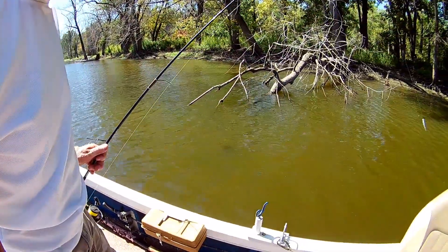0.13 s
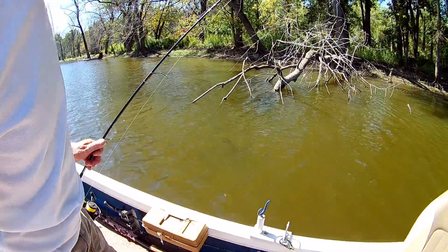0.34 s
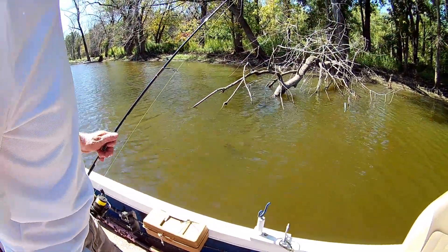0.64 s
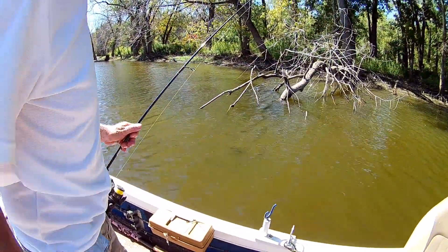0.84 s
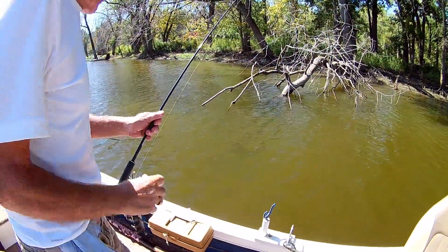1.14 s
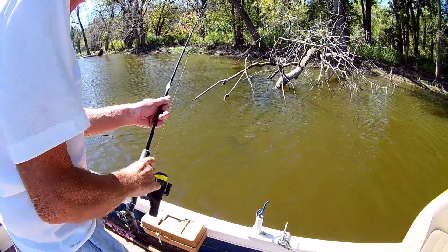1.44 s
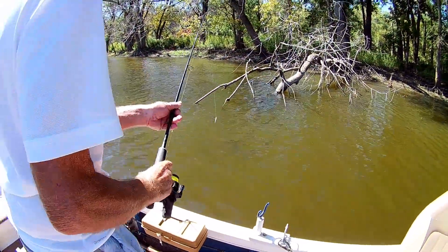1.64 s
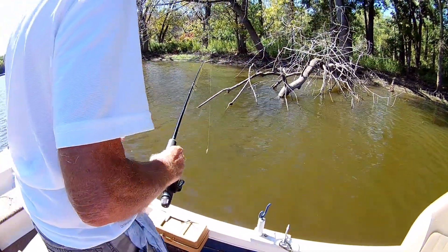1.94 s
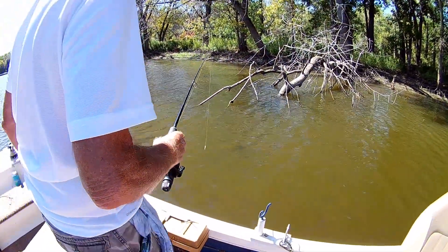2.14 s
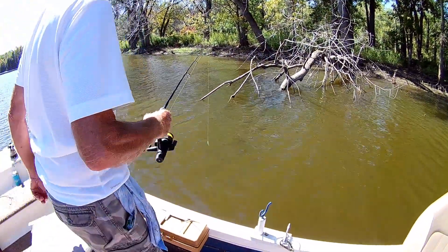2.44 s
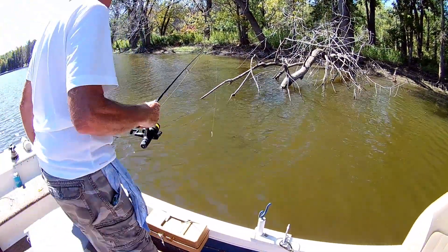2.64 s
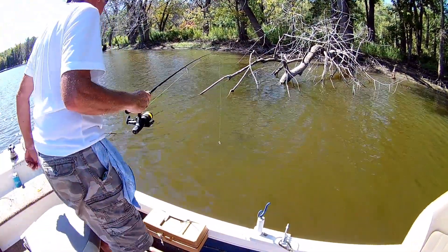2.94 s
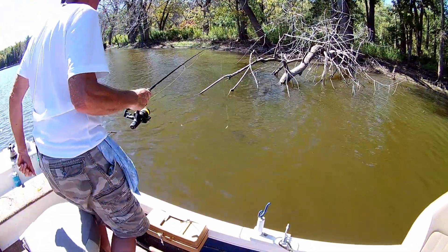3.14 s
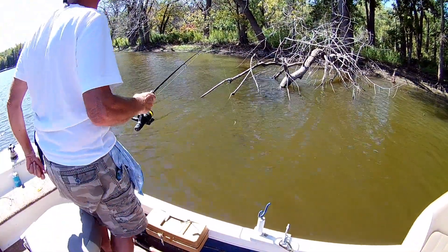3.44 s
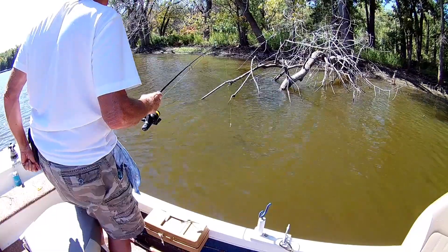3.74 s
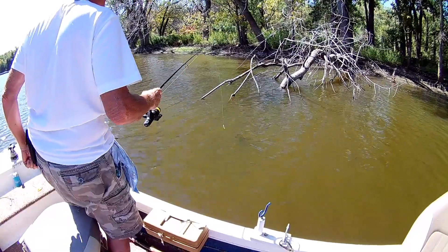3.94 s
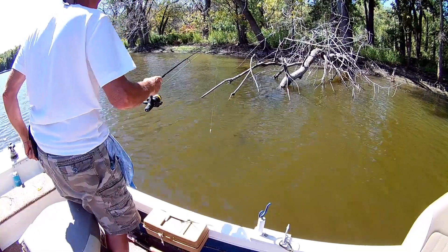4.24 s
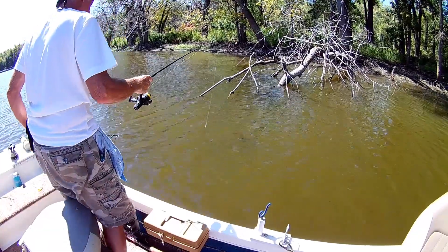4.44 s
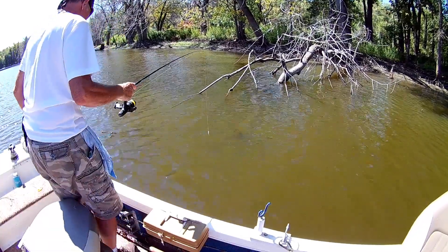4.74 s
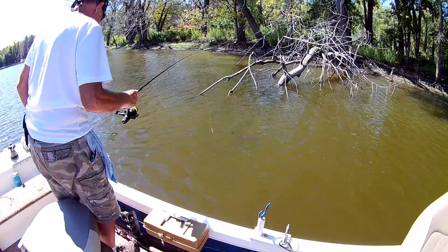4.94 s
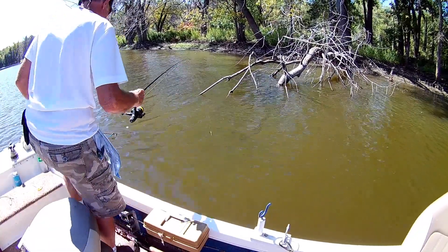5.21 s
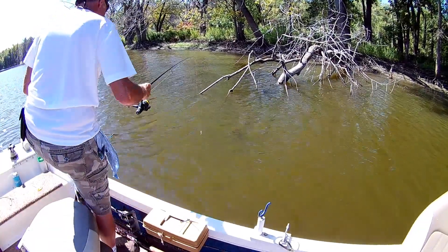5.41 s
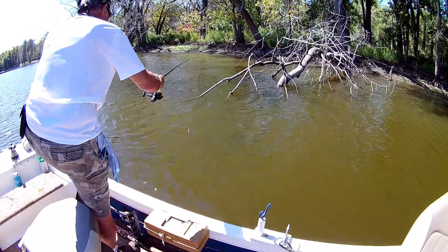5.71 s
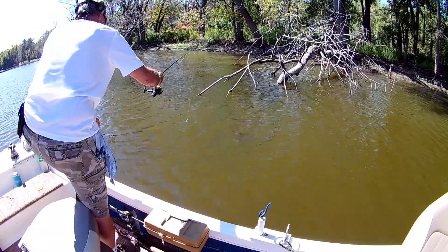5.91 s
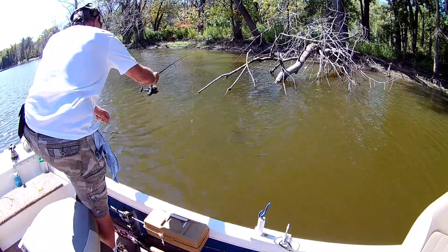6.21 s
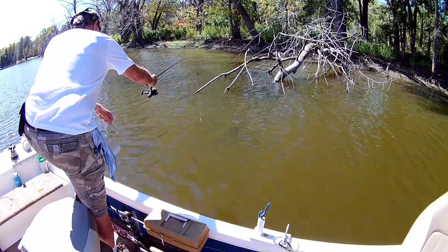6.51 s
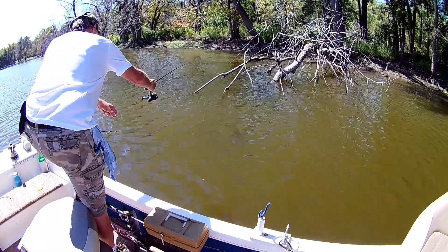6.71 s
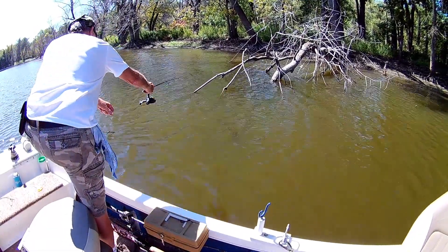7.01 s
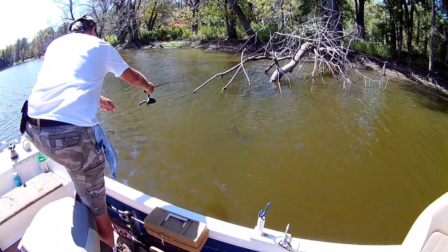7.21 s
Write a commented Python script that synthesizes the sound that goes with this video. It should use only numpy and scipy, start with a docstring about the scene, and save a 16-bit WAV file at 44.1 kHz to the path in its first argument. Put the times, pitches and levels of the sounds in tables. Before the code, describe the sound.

Close on a small boat's deck, fishing gear clatters hard against the hollow hull in the first second, with sharp ticks, rough scuffs and woody knocks. Dull foot thumps follow, bunching after two seconds, with one firm knock soon after. Later steps are softer and spaced out. Small water plops, faint lapping, low rumble, weak hum and thin hiss remain beneath, dry and outdoors.

```python
"""Angler on a small boat

Shifting feet thump the deck while gear knocks, ticks and scuffs on the hollow hull, with a few faint tones.
Ripples plop under the hull, over a low rumble, a faint hum and a thin hiss. Blows are decaying sines with
resonant noise; scuffs, lapping and hiss are shaped noise; plops are rising sines. Each move of the angler
swells the background."""
import sys
import numpy as np
from scipy.fft import rfft, irfft, next_fast_len
from scipy.io import wavfile
from scipy.ndimage import map_coordinates

SR = 44100
rng = np.random.default_rng(int(sys.argv[2]) if len(sys.argv) > 2 else 0)


def wrap_up_sound(samples):
    """Save the sound to the file named by the first command line argument, as 16-bit audio."""
    columns = np.atleast_2d(samples).T
    # keep every value between -1 and 1, then stretch to whole-number steps
    tamed = np.clip(columns, -1, 1)
    steps = np.round(tamed * 32767).astype(np.int16)
    wavfile.write(sys.argv[1], SR, steps)


N = 324576  # length in samples


def amp(db):
    """Turn decibels into gain."""
    return 10 ** (np.asarray(db) / 20)


def unit(x):
    """Scale to rms 1."""
    return x / np.sqrt(np.mean(x ** 2) + 1e-20)


def along(points, hz):
    """Read a curve of (Hz, value) points on a log frequency axis."""
    f, value = np.transpose(points)
    return np.interp(np.log(hz + 1), np.log(f), value)


def wobble(rate):
    """Draw a smooth random curve through `rate` knots a second."""
    knots = rng.standard_normal(int(N * rate / SR) + 4)
    return map_coordinates(knots, [np.arange(N) * rate / SR])


def filtered(x, response):
    """Filter x by a complex response of frequency, padded so the tail does not wrap."""
    size = next_fast_len(len(x) + 8192)
    spectrum = rfft(x, size) * response(np.fft.rfftfreq(size, 1 / SR))
    return irfft(spectrum, size)[:len(x)]


def noise(colour, size):
    """Noise of rms 1 with the given (Hz, dB) colour."""
    return unit(filtered(rng.standard_normal(size), lambda hz: amp(along(colour, hz))))


def fade(t, t60, attack):
    """A quick rise and an exponential decay by 60 dB in t60 seconds, 4 ms at least."""
    return amp(-60 * t / max(t60, 0.004)) * (1 - np.exp(-t / attack))


def sine_rms(envelope):
    """The rms of a sine under this envelope."""
    return np.sqrt(np.mean(envelope ** 2) / 2)


def burst(carrier, envelope):
    """A noisy carrier under an envelope, with the energy of a sine under that envelope."""
    return unit(carrier * envelope) * sine_rms(envelope)


def body(modes, f):
    """Response of a body as a sum of (Hz, width Hz, dB) resonances."""
    return sum(amp(db) * 1j * f * width / (centre * centre - f * f + 1j * f * width)
               for centre, width, db in modes)


def add(track, start, sound):
    """Mix a sound into the track at start seconds."""
    part = track[max(round(start * SR), 0):][:len(sound)]
    part += sound[:len(part)]


# Steady tones. Each row: pitch in Hz, rms level in dB, speed of the wavering in knots per second.
HUM_TONES = [(53.8, -52, 7.2), (238.7, -55.5, 9), (3310, -79, 24)]


def hum():
    """A faint low hum and a thin whine, each wavering in level and phase."""
    t = np.arange(N) / SR
    out = np.zeros(N)
    for hz, db, waver_rate in HUM_TONES:
        swell = 1 + wobble(waver_rate) / 2
        out += amp(db) * unit(swell * np.sin(2 * np.pi * hz * t + wobble(waver_rate)))
    return out


# Steps and shifts of weight. Each row: height of the move in seconds, strength in dB,
# time to settle by 60 dB in seconds.
WEIGHT_SHIFTS = [(0.02, -5.5, 0.2), (0.15, -2, 0.5), (0.335, 16.5, 0.18), (0.505, 15.5, 0.55),
                 (0.68, 6, 0.86), (1.0, -3, 0.6), (1.6, 2, 0.84), (1.98, -0.5, 0.4), (2.18, 6, 1.1),
                 (2.32, 9, 0.84), (2.65, 10, 0.5), (2.86, -1, 1.2), (3.04, 2.5, 0.25), (3.27, -1, 0.2),
                 (3.42, 5, 0.6), (3.72, -1, 0.64), (4.07, -0.5, 0.4), (4.44, 3, 0.63), (4.785, 4.5, 0.4),
                 (5.11, -6, 1.0), (5.48, -1, 1.0), (5.84, 2, 0.5), (5.97, 0, 0.6), (6.32, 6.5, 0.55),
                 (6.54, 1.5, 0.2), (6.675, 7, 0.5), (7.06, -3, 1.6)]


def movement(wind_up_s=0.38, haste_per_db=0.035):
    """How hard the angler moves: each move builds by 60 dB, peaks and settles, stronger ones building faster."""
    t, power = np.arange(N) / SR, np.zeros(N)
    for peak, db, settle in WEIGHT_SHIFTS:
        build = wind_up_s * np.exp(-haste_per_db * db)
        drop_db = 60 * np.maximum((peak - t) / build, (t - peak) / settle)
        power += amp(db - drop_db) ** 2
    return np.sqrt(power)


def swell_with(effort, settings):
    """The gain of a background layer: its resting level and the part stirred by movement, added in power."""
    rest_db, move_db, growth = settings
    return np.hypot(amp(rest_db), amp(move_db) * effort ** growth)


# The rocking hull. Colour, each row: frequency in Hz, relative level in dB. Swell: level at rest in dB,
# level stirred by a 0 dB move in dB, growth in dB per dB of strength.
RUMBLE_COLOUR = [(11, -34), (18, 0), (59, 2.5), (97, -6), (130, -10.5), (170, -32), (290, -120)]
RUMBLE_SWELL = (-49.5, -40.5, 1.0)


def rumble(effort):
    """The hull rumbles as it rocks: low noise that follows the movement."""
    return swell_with(effort, RUMBLE_SWELL) * noise(RUMBLE_COLOUR, size=N)


# Soles on the deck. Colour, each row: frequency in Hz, relative level in dB. Swell, before the flutter:
# level at rest in dB, level stirred by a 0 dB move in dB, growth in dB per dB of strength.
SHUFFLE_COLOUR = [(50, -9), (90, 0.5), (160, 0), (240, -3), (330, -7.5), (480, -13.5), (800, -39),
                  (2000, -70)]
SHUFFLE_SWELL = (-52.5, -46.5, 0.83)


def shuffle(effort):
    """Soles shuffle: dull noise flutters unevenly and swells with each move."""
    flutter = amp(1.5 * wobble(25))
    return swell_with(effort, SHUFFLE_SWELL) * flutter * noise(SHUFFLE_COLOUR, size=N)


# A thin hiss. Colour, each row: frequency in Hz, relative level in dB. Swell, before the flutter:
# level at rest in dB, level stirred by a 0 dB move in dB, growth in dB per dB of strength.
HISS_COLOUR = [(1290, -19), (2200, -0.5), (3170, -2.5), (3390, -0.5), (3670, -6.5), (4970, -3), (5610, -6),
               (6190, 0), (6600, -2.5), (7340, 0), (9220, -7), (10000, 1), (10900, -4), (14800, 1),
               (15400, -8)]
HISS_SWELL = (-66, -60, 0.6)


def hiss(effort):
    """A thin, lightly fluttering hiss that swells with the movement."""
    flutter = amp(0.94 * wobble(25))
    return swell_with(effort, HISS_SWELL) * flutter * noise(HISS_COLOUR, size=N)


def bubble(hz, t60=0.045, rise=6, attack=0.0046):
    """A pocket of air rings, its pitch rising by `rise` times hz per second as it nears the surface."""
    t = np.arange(SR // 10) / SR
    bent_time = t + rise * (t * t / 2 - attack * t)
    return np.sin(2 * np.pi * hz * bent_time) * fade(t, t60, attack)


def ripples(count, centre_hz=900, spread=0.576, scatter_db=5):
    """Many tiny, dead splashes along the waterline, scattered in time, pitch and level, at rms 1."""
    out = np.zeros(N)
    for when, pitch, size in rng.random((count, 3)):
        hz = centre_hz * np.exp(spread * (2 * pitch - 1))
        splash = bubble(hz, t60=0.025, rise=2.5, attack=0.00051)
        add(out, when * N / SR, amp(scatter_db * (2 * size - 1)) * splash)
    return unit(out)


# Water against the hull. Colour, each row: frequency in Hz, relative level in dB. Swell, before flutter and
# ripples: level at rest in dB, level stirred by a 0 dB move in dB, growth in dB per dB of strength.
LAPPING_COLOUR = [(250, -17.5), (500, 2), (800, 0), (1100, -1.5), (1450, -6), (1800, -9), (2400, -17),
                  (4000, -19.5), (9000, -51)]
LAPPING_SWELL = (-59.5, -54.5, 0.68)


def lapping(effort, ripple_db=-8.5):
    """Water laps as fluttering noise sprinkled with tiny bubbles, more so as the angler moves."""
    wash = amp(wobble(30)) * noise(LAPPING_COLOUR, size=N)
    return swell_with(effort, LAPPING_SWELL) * (wash + amp(ripple_db) * ripples(count=500))


# Ripples trapped under the hull. Each row: start in seconds, level in dB before the trim, bubble pitch in Hz.
HULL_PLOPS = [(0.048, -43, 1070), (1.394, -40.5, 1300), (2.138, -41, 1240), (3.339, -37, 1040),
              (4.364, -36, 990), (4.597, -37, 948), (4.736, -46, 912), (5.516, -42, 1410),
              (5.795, -38, 840), (6.537, -45, 1170), (6.837, -39, 1170)]


def plops(trim_db=1):
    """The few ripples that slap the hull clearly, each a single rising bubble."""
    out = np.zeros(N)
    for start, db, hz in HULL_PLOPS:
        add(out, start, amp(db + trim_db) * bubble(hz))
    return out


# Clean tones, the last two short squeaks. Each row: start in seconds, length in seconds, pitch in Hz,
# peak level in dB.
THIN_TONES = [(0.02, 0.93, 812, -51), (0.356, 0.68, 670, -53), (0.63, 0.04, 4850, -48.5),
              (3.44, 0.06, 12327, -56)]


def tones():
    """Faint pure tones that swell and fade under half a sine."""
    out = np.zeros(N)
    for start, length, hz, db in THIN_TONES:
        t = np.arange(int(length * SR)) / SR
        add(out, start, amp(db) * np.sin(np.pi * t / length) * np.sin(2 * np.pi * hz * t))
    return out


# Gear and soles dragged over the deck. Each row: start in seconds, length in seconds, level in dB mid-stroke.
SCUFF_STROKES = [(0.28, 0.115, -34.5), (0.445, 0.2, -35), (0.643, 0.084, -37), (2.29, 0.25, -43),
                 (3.338, 0.13, -47.5), (4.39, 0.11, -49.5), (6.63, 0.095, -49)]
# Colour of the rough deck. Each row: frequency in Hz, relative level in dB.
SCUFF_COLOUR = [(150, -20), (370, 2), (600, -1.5), (900, 2), (1450, -1), (1800, -14), (3000, -18),
                (6000, -27.5), (9000, -38), (15000, -40)]


def scuffs(grit_db=2.5, grit_rate=180):
    """Each stroke swells and fades, catching unevenly on the rough deck (grit in knots per second)."""
    pressure = np.zeros(N)
    for start, length, db in SCUFF_STROKES:
        add(pressure, start, amp(db) * np.hanning(int(length * SR)))
    grit = amp(grit_db * wobble(grit_rate))
    return pressure * unit(grit * noise(SCUFF_COLOUR, size=N))


# Rod and reel ticking against the side; the row at 2.651 s adds brightness to the hull knock at 2.648 s. # Each
# row: start in seconds, level in dB before the trim, decay by 60 dB in seconds, brightness in dB per octave.
GEAR_TICKS = [(0.327, -30, 0.018, 8), (0.331, -14, 0.01, 6.5), (0.342, -29, 0.02, 4), (0.35, -29, 0.042, 7),
              (0.369, -28, 0.021, 11), (0.382, -33, 0.033, 11), (0.505, -8.5, 0.024, -10),
              (0.564, -29, 0.039, -3), (0.577, -25.5, 0.048, -0.5), (0.591, -25, 0.04, -4.5),
              (0.678, -22, 0.04, -2), (0.684, -22, 0.04, 1.5), (0.8, -32, 0.035, -6),
              (0.824, -27.5, 0.044, -5.5), (0.84, -29.5, 0.047, -7), (0.958, -32.5, 0.041, -4.5),
              (2.203, -41, 0.03, -5), (2.651, -31, 0.05, -6), (3.415, -35.5, 0.022, -2)]
# Resonances of rod and reel. Each row: frequency in Hz, width in Hz, relative level in dB.
ROD_MODES = [(1410, 390, 11.5), (2110, 65, 22), (2333, 90, 24), (2670, 77, 17.5), (2850, 110, 15),
             (3370, 58, -18), (3500, 120, -14), (4160, 130, -16), (4800, 130, -12), (5400, 130, -24),
             (6060, 160, -6), (6640, 200, -27)]
# Colour of the scrape. Each row: frequency in Hz, relative level in dB.
SCRAPE_COLOUR = [(500, -21), (1200, 9.5), (3100, -2), (4000, -0.5), (7000, -16), (9000, -60), (15000, -47)]


def ticks(attack=0.00047, trim_db=-3, pivot_hz=3000, scrape_db=-5):
    """Short contacts ring the modes of the rod and reel over a broad scrape, each with its own brightness."""
    out, t = np.zeros(N), np.arange(SR // 5) / SR
    for start, db, t60, tilt_db in GEAR_TICKS:
        hit = rng.standard_normal(len(t))
        modes = unit(filtered(hit, lambda f: body(ROD_MODES, f) / (1 + (f / 8000) ** 4)))
        contact = modes + amp(scrape_db) * noise(SCRAPE_COLOUR, size=len(t))
        # the tilt pivots at 3 kHz and levels off outside 0.3 to 2 times that
        contact = filtered(contact, lambda f: amp(tilt_db * np.log2(np.clip(f / pivot_hz, 0.3, 2))))
        add(out, start, amp(db + trim_db) * burst(contact, fade(t, t60, attack)))
    return out


# The boat's lively notes, where a blow rings on. Each row: pitch in Hz, width in Hz,
# decay time added in seconds.
LIVELY_NOTES = [(161, 14, 0.09), (303.6, 8.8, 0.063), (392, 16, 0.15), (877, 12, 0.073), (1536, 25, 0.03)]


def lingering(hz):
    """Extra ring time in seconds of a blow that lands near a lively note."""
    return sum(added / (1 + (2 * (hz - note) / width) ** 2) for note, width, added in LIVELY_NOTES)


# Feet and heavy gear flexing the deck. Each row: start in seconds, level in dB, panel pitch in Hz.
DECK_THUMPS = [(0.333,-20,127), (0.345,-20.5,307), (0.350,-24,386), (0.501,-24.5,392), (0.513,-18,305),
               (0.545,-29,352), (0.594,-22,304), (0.668,-21,268), (0.683,-26,379), (1.596,-24,155.7),
               (1.969,-31,265), (2.199,-28.5,335), (2.291,-23,292), (2.315,-16.5,221), (2.347,-24.5,101),
               (2.376,-26,84), (2.434,-27,101.5), (2.498,-27.5,88), (2.65,-27,150), (2.665,-27,378),
               (2.672,-23.5,270), (2.844,-28,90.4), (3.028,-31.5,248), (3.408,-26.5,171), (3.415,-22.5,246),
               (4.077,-32,110), (4.436,-29,81), (4.465,-30,275), (4.773,-26.5,322), (4.777,-25.5,502),
               (5.485,-30,91.6), (5.992,-21,272.5), (6.324,-20,208), (6.328,-24.5,482), (6.333,-25.5,297),
               (6.527,-34.5,80), (6.677,-22.5,166), (7.046,-33,204)]
# Colour of the neighbouring panels. Each row: frequency in Hz, relative level in dB.
DECK_COLOUR = [(40, -41), (100, 4), (220, -0.5), (330, -1), (480, -8.5), (700, -4.5), (1500, -45),
               (4000, -84)]


def thumps(attack=0.002, panel_cycles=20.7, crowd_db=-7, crowd_t60=0.16,
           boom_centre_hz=82, boom_t60=0.14, boom_db=-11):
    """A soft blow bends a deck panel, stirs its neighbours and pushes the whole hull."""
    out, t = np.zeros(N), np.arange(SR // 2) / SR
    for start, db, hz in DECK_THUMPS:
        # decay is counted in cycles, so low panels ring longer, plus any lively note
        panel_t60 = panel_cycles / hz + lingering(hz)
        panel = np.sin(2 * np.pi * hz * t) * fade(t, panel_t60, attack)
        # slow blows reach fewer high modes
        stirred = filtered(noise(DECK_COLOUR, size=len(t)), lambda f: 1 / (1 + 1j * f / (2 * hz)))
        crowd = burst(stirred, fade(t, crowd_t60, attack))
        boom_hz = boom_centre_hz * np.exp(rng.normal(0, 0.11))
        boom = np.sin(2 * np.pi * boom_hz * t) * fade(t, boom_t60, 2 * attack)
        add(out, start, amp(db) * (panel + amp(crowd_db) * crowd + amp(boom_db) * boom))
    return out


# Hard contacts on hull and gear. Each row: start in seconds, level in dB before the ring and rattle trims,
# ring pitch in Hz, clatter level against the ring in dB before those trims.
HULL_KNOCKS = [(0.149,-30.5,1100,-9), (0.317,-29.5,1410,3), (0.333,-16,1277,-12), (0.340,-13.5,1317,3),
               (0.346,-15.5,913,-0.5), (0.361,-20.5,1265,-10), (0.505,-12,1536,-4), (0.546,-16.5,877,-13),
               (0.563,-14,1277,-8), (0.591,-24.5,1310,-12), (0.669,-27.5,1190,-2), (0.680,-15,1358,-2),
               (0.686,-14,868,-9), (0.991,-25.5,1380,-10), (1.571,-41,1315,-2), (1.664,-43,1080,-1),
               (1.927,-43,1340,-8), (1.964,-41,1295,-9), (2.202,-29.5,1175,-0.5), (2.298,-34,1080,-2),
               (2.315,-29,1075,1), (2.386,-31,1040,0), (2.411,-28.5,580,-14), (2.479,-36,1125,-3),
               (2.648,-14,915,-5.5), (2.651,-22,624,-12), (2.848,-30.5,820,-7.5), (3.377,-36.5,850,1),
               (3.460,-25.5,816,-8.5), (3.737,-31.5,810,-6.5), (3.825,-37.5,1015,-1), (4.465,-29,700,-8),
               (4.773,-30.5,716,-6), (5.988,-26.5,993,-3.5), (6.323,-35.5,900,2), (6.385,-31.5,1140,-2),
               (6.676,-37,1590,-1), (7.274,-35.5,923,-12)]
# Resonances of the hull side. Each row: frequency in Hz, width in Hz, relative level in dB.
WALL_MODES = [(380, 69, -7.5), (556, 43, -11), (690, 100, -10), (855, 19, 4), (1046, 36, -5),
              (1118, 89, 2.5), (1209, 52, 0), (1379, 30, 4), (1520, 14, -5), (1970, 74, -21),
              (2330, 38, -25), (2520, 27, -26), (2750, 85, -19)]
# Colour of the rattle. Each row: frequency in Hz, relative level in dB.
RATTLE_COLOUR = [(150, -30), (400, -10), (600, -9.5), (850, 7), (1250, -7), (1500, -1), (1750, -18),
                 (2600, -21), (4500, -25), (12000, -44)]


def knocks(hard_attack=0.00079, hard_db=-12, give=0.18, damped_t60=0.049, contact_t60=0.022,
           ring_db=-1, rattle_db=-6, rattle_t60=0.068, softness=2.03):
    """Each contact rings one mode most, set by where it lands, with the rest of the wall and a short rattle."""
    out, t = np.zeros(N), np.arange(SR // 3) / SR
    for start, db, hz, clatter_db in HULL_KNOCKS:
        attack = hard_attack * amp(give * (hard_db - db))  # gentler contacts rise more slowly
        # most of the wall is well damped
        envelope = fade(t, damped_t60 + lingering(hz), attack)
        ring = np.sin(2 * np.pi * hz * t) * envelope
        # low-pitched contacts are also softer
        dull = lambda f: 1 / (1 + 1j * f / (softness * hz)) ** 2
        force = rng.standard_normal(len(t)) * fade(t, contact_t60, attack)
        wall = unit(filtered(force, lambda f: body(WALL_MODES, f) * dull(f))) * sine_rms(envelope)
        rattle = burst(filtered(noise(RATTLE_COLOUR, size=len(t)), dull), fade(t, rattle_t60, attack))
        clatter = wall + amp(rattle_db) * rattle
        add(out, start, amp(db) * (amp(ring_db) * ring + amp(clatter_db) * clatter))
    return out


def scene():
    """Everything on and around the boat, in open air."""
    effort = movement()
    background = hum() + rumble(effort) + shuffle(effort) + hiss(effort) + lapping(effort)
    details = plops() + tones() + scuffs()
    return (background + details + ticks() + thumps() + knocks())[None]


def record(dry, top_hz=15550):
    """Keep nothing from the band limit upward."""
    return filtered(dry[0], lambda hz: hz < top_hz)[None]


dry = scene()
out = record(dry)
wrap_up_sound(out)
```